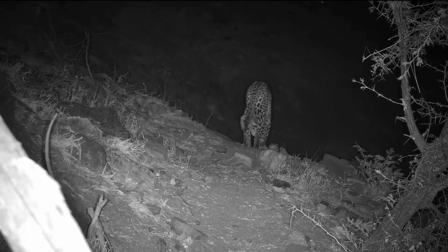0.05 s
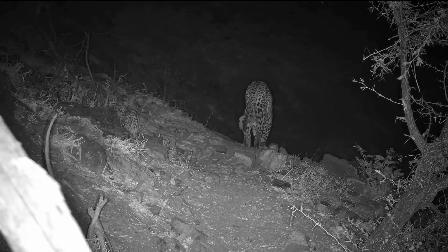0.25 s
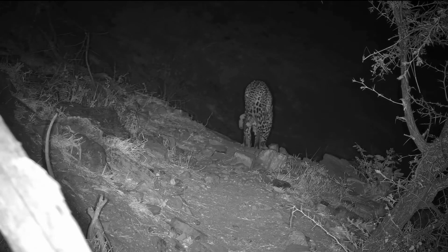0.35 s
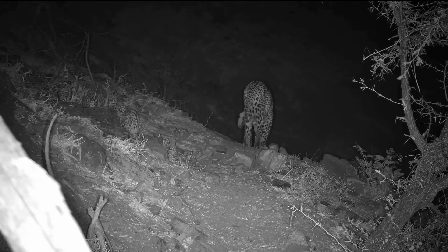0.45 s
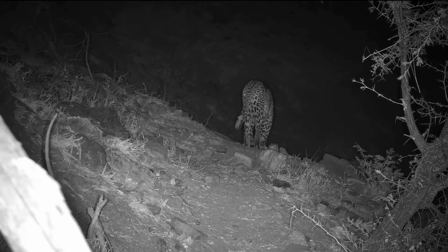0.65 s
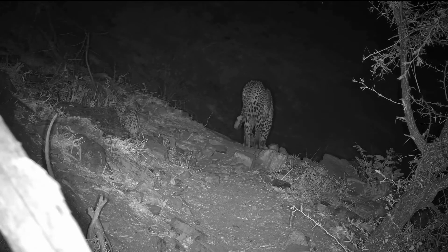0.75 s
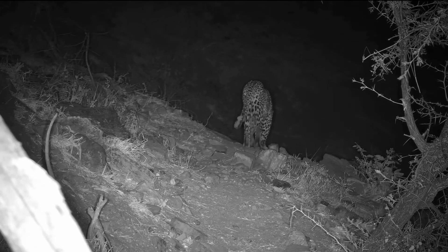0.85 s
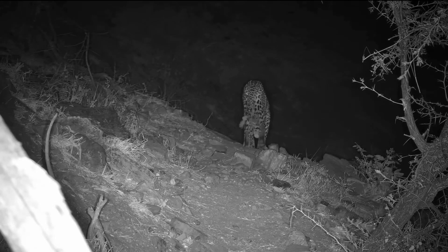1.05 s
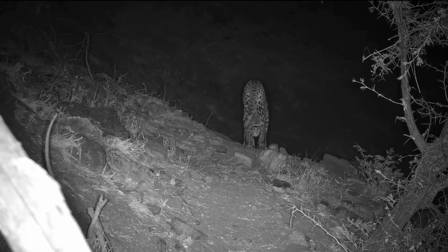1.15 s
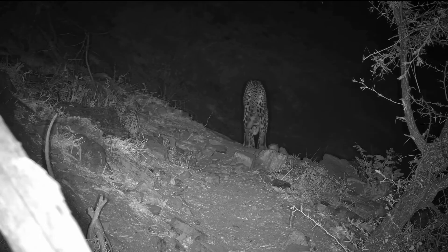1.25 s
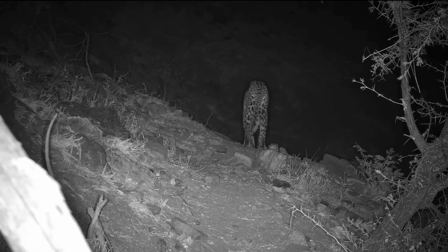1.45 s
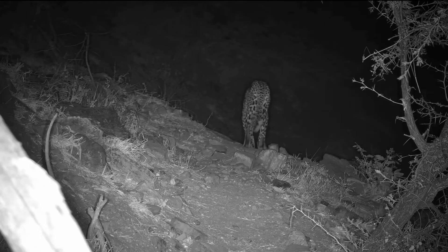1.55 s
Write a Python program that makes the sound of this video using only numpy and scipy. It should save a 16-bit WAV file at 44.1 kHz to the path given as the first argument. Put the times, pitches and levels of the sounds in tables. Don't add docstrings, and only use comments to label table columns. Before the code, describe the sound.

Two hoarse, sawing big cat calls, each a low rattling in-breath then a short throaty cough, outdoors at night. Steady boxy hum and insect buzz lie beneath; a faint distant bird trill and frog pips come late.

```python
import sys
import numpy as np
from scipy import signal
from scipy.fft import rfft, irfft
from scipy.io import wavfile
from scipy.ndimage import uniform_filter1d

SR = 44100
rng = np.random.default_rng(int(sys.argv[2]) if len(sys.argv) > 2 else 0)


def rack_gain(trim_db):
    fader = np.asarray(trim_db, float)
    return 10 ** (fader / 20)


def to_wav(s):
    ch = np.atleast_2d(s).T
    pcm = np.round(np.clip(ch, -1, 1) * 32767)
    wavfile.write(sys.argv[1], SR, pcm.astype(np.int16))


N = 70560

# [f/Hz, density/dB per Hz]
NIGHT_SPECTRUM = [(20, -31), (120, -22.5), (330, -13.5), (500, -11), (900, -20.5), (1500, -30),
                  (2500, -30.5), (11000, -33.5)]
# [t/s, level/dB, mouth opening/dB, chest rumble/dB]
BREATH_EFFORT = [(0, -57.5, 9.5, 9), (0.089, -55.5, 8, 8.5), (.22, -43.5, 4.5, 3), (0.304, -52, 5, 3),
                 (.34, -33, -2.5, -6.5), (.385, -25, -3.5, -3.5), (.44, -32.5, -2, -5.5),
                 (.53, -39, -1.5, -2), (.62, -50, 3, -0.5), (0.841, -50, 1, -2), (.95, -46, 7.5, 10),
                 (1.03, -54, 8, 10.5), (1.114, -38.5, -3, -10), (1.141, -31.5, 1.5, -2.5),
                 (1.18, -32, 2.5, -7), (1.23, -39.5, -1, 1.5), (1.3, -41, -1, -2.5), (1.42, -60, 9, 5)]
# [f/Hz, width/Hz, level/dB]
THROAT_RESONANCES = [(428, 33, -15.5), (531.4, 75, -8.5), (565, 30, -6), (652, 29, -5.5), (718, 61, -5),
                     (816.6, 43, -9)]
# [f/Hz, width/Hz, level/dB]
OPEN_MOUTH_RESONANCES = [(954, 47, -18.5), (1121, 150, -20), (1394, 220, -24), (1606, 71, -21),
                         (1893, 320, -27)]
# [f/Hz, width/Hz, level/dB]
WINDPIPE_RESONANCES = [(40.3, 46, -41), (80, 66, -14.5), (160, 66, -8.5), (284.5, 64, -12.5)]
# [t/s, length/s, peak level/dB]
WHEEZE_BURST = (0.408, 0.085, -59.5)
# [f/Hz, width/Hz, level/dB]
WHEEZE_RESONANCES = [(3270, 500, 0), (5300, 350, -3)]
# [t/s, length/s, peak level/dB, f/Hz]
AIRWAY_WHISTLES = [(0.069, .06, -47, 860), (.18, 0.084, -50.5, 900), (.39, 0.056, -38, 436),
                   (.49, .07, -39, 436), (1.225, 0.052, -50, 980), (.93, 0.071, -42, 925),
                   (1.115, 0.061, -27, 840), (.435, 0.024, -55.5, 3020), (0.58, 0.042, -59, 1300),
                   (1.38, 0.085, -55, 1620)]
# [t/s, length/s, peak level/dB, f/Hz]
CHEST_FLAPS = [(.088, 0.032, -40, 160), (.132, 0.044, -38, 152), (.172, 0.032, -44.5, 160),
               (.208, 0.06, -36, 137), (.248, 0.043, -41, 147), (.315, 0.016, -39, 150.1),
               (.342, 0.027, -26.5, 171.2), (.372, 0.075, -22, 171.7), (.442, 0.038, -28.5, 160),
               (.478, 0.036, -38, 172.3), (.525, 0.026, -39, 147.7), (.845, 0.031, -40.5, 150.6),
               (.888, 0.031, -40, 160), (.934, 0.043, -37, 146), (.972, 0.059, -38.5, 143),
               (1.035, .035, -47, 141.8), (1.075, 0.0338, -42.5, 180.7), (1.108, 0.029, -27.5, 171.3),
               (1.126, 0.056, -24, 175), (1.158, 0.052, -22.5, 160), (1.205, 0.026, -33.5, 153.8),
               (1.238, 0.063, -36.5, 166.8), (1.29, 0.064, -48, 153)]
# [t/s, length/s, peak level/dB, f/Hz]
MOUTH_FLAPS = [(.092, 0.034, -31, 606), (.12, 0.026, -31.5, 603.7), (.158, 0.024, -29, 609.9),
               (.198, 0.034, -28, 590.4), (.23, .03, -25.5, 565), (.258, 0.035, -33.5, 557),
               (.318, 0.026, -28.5, 597.3), (.34, 0.027, -19, 610.5), (.377, .014, -11.5, 629),
               (.398, 0.017, -11.5, 606), (.411, .03, -10.5, 605), (.438, 0.023, -24.5, 585.3),
               (.485, 0.03, -31.5, 610.1), (.503, 0.027, -29.5, 609.9), (.53, 0.059, -32.5, 611),
               (.877, 0.034, -36.5, 600.8), (.918, 0.018, -27, 595.4), (.94, 0.023, -26.5, 571.7),
               (.956, .028, -30.5, 569), (1.025, 0.055, -36, 565), (1.07, 0.027, -35, 619.2),
               (1.115, 0.023, -24.5, 624), (1.135, 0.017, -14.5, 616.5), (1.15, 0.035, -13.5, 610),
               (1.182, .026, -23.5, 587.4), (1.22, 0.039, -33.5, 611), (1.265, 0.044, -29.5, 609),
               (1.36, 0.054, -35, 605.3), (1.472, 0.038, -40, 610.3)]
# [t/s, peak level/dB]
BIRD_NOTES = [(.805, -66), (.85, -60.5), (.895, -58.5), (.94, -57), (.988, -57), (1.052, -52.5),
              (1.118, -55), (1.185, -54), (1.255, -53), (1.327, -53), (1.402, -54), (1.45, -60),
              (1.53, -62.5)]
# [t/s, peak level/dB]
FROG_PIPS = [
    (1.001, -64),
    (1.328, -60),
    (1.479, -56),
]

NIGHT_DB = -49.5
BOX_HZ, BOX_WIDTH_HZ, BOX_DB = 613.7, 32, -48.5
BOX_SKIRT_WIDTH_HZ, BOX_SKIRT_DB = 213, -1.5
CHORUS_HZ, CHORUS_WIDTH_HZ, CHORUS_DB = 4800, 260, -69.5
STROKE_RATE_HZ, STROKE_FIRST_S, STROKE_WIDTH_S = 100.316, .0037, 0.00038
TICK_HZ, TICK_EDGE_HZ, TICK_DB = 10176, 10878, -47
TAIL_HZ, TAIL_LAG_S, TAIL_DB = 8972, 0.00025, -54.5
GRASS_DB = -14.5
RATTLE_HZ, RATTLE_DB = 70.11, 1.5
FLAP_WOBBLE_RAD = .3
SLOPE_ECHO_DB, SLOPE_T60_S = -18, .6
NOTE_S, NOTE_HZ, NOTE_FALL = .033, 3710, .16
PIP_S, PIP_HZ, PIP_FALL = .013, 2640, .03
LEAVES_DB = -7
LIMIT, TOP_HZ = .6, 10990


def level(x, db):
    return x * rack_gain(db) / np.sqrt(np.mean(x ** 2))


def ring(x, hz, width):
    return signal.lfilter(*signal.iirpeak(hz, hz / width, SR), x)


def walk(rate):
    hold = int(SR / rate)
    steps = rng.standard_normal(N)[np.arange(N) // hold]
    return 1.31 * uniform_filter1d(uniform_filter1d(steps, hold), hold)


def swell(start, length, db, edge, lean):
    passed = np.clip((np.arange(N) / SR - start) / length, 0, 1)
    arch = np.maximum(np.sin(np.pi * passed ** lean), 0)
    return rack_gain(db) * arch ** edge, passed


def tones(rows, sag):
    out = np.zeros(N)
    turns = rng.random(len(rows))
    for (start, length, db, hz), turn in zip(rows, turns):
        size, passed = swell(start, length, db, .8, 1)
        cycles = hz * length * (passed - sag * passed ** 3 / 3)
        out += size * np.sin(2 * np.pi * (turn + cycles))
    return out


def smear(x, t60, rise):
    t = np.arange(N // 2) / SR
    tail = rng.standard_normal(len(t)) * rack_gain(-60 * t / t60) * np.clip(t / rise, 0, 1)
    return signal.fftconvolve(x, tail / np.sqrt(np.sum(tail ** 2)))[:N]


def night_air():
    f = np.maximum(np.arange(N // 2 + 1) * SR / N, 1)
    hz, db = np.array(NIGHT_SPECTRUM).T
    gain = rack_gain(np.interp(np.log(f), np.log(hz), db))
    return level(irfft(rfft(rng.standard_normal(N)) * gain, N), NIGHT_DB)


def microphone_box():
    push = rng.standard_normal(N)
    skirt = ring(ring(push, BOX_HZ, BOX_SKIRT_WIDTH_HZ), BOX_HZ, BOX_SKIRT_WIDTH_HZ)
    hum = ring(skirt, BOX_HZ, BOX_WIDTH_HZ)
    return level(hum, BOX_DB) + level(skirt, BOX_DB + BOX_SKIRT_DB)


def insect_chorus():
    chorus = ring(rng.standard_normal(N), CHORUS_HZ, CHORUS_WIDTH_HZ)
    return level(chorus * rack_gain(1.5 * walk(25)), CHORUS_DB)


def katydid():
    t = np.arange(N) / SR

    def gate(lag):
        cycle = (t - STROKE_FIRST_S - lag) * STROKE_RATE_HZ
        offset = ((cycle + .5) % 1 - .5) / STROKE_RATE_HZ
        return np.exp(-.5 * (offset / STROKE_WIDTH_S) ** 2)

    def tone(hz, wander):
        return np.sin(2 * np.pi * hz * t + wander)

    drift = 1.2 * walk(6) + .7 * walk(150)
    edge = 0.59 * tone(TICK_EDGE_HZ, drift + 1.9 * walk(98))
    tick = rack_gain(TICK_DB) * gate(0) * (tone(TICK_HZ, drift) + edge)
    tail = rack_gain(TAIL_DB) * gate(TAIL_LAG_S) * tone(TAIL_HZ, drift + .8 * walk(100))
    strokes = (tick + tail) * rack_gain(1.2 * walk(120))
    return strokes + rack_gain(GRASS_DB) * smear(strokes, .06, .003)


def breath():
    t, db, opening, rumble = np.array(BREATH_EFFORT).T
    air = rng.standard_normal(N) * rack_gain(RATTLE_DB * walk(RATTLE_HZ))

    def curve(points):
        return rack_gain(np.interp(np.arange(N) / SR, t, points))

    def resonate(rows):
        out = np.zeros(N)
        for k, (hz, width, gain) in enumerate(rows):
            wide = 1.58 * width
            out += (-1) ** k * level(ring(ring(air, hz, wide), hz, wide), gain)
        return out

    mouth = curve(opening) * resonate(OPEN_MOUTH_RESONANCES)
    chest = curve(rumble) * resonate(WINDPIPE_RESONANCES)
    wheeze = swell(*WHEEZE_BURST, 0.5, 0.54)[0] * resonate(WHEEZE_RESONANCES)
    return curve(db) * (resonate(THROAT_RESONANCES) + mouth + chest) + wheeze


def airway_whistles():
    return tones(AIRWAY_WHISTLES, 0.0098)


def cavity(rows, edge, lean):
    start, length, _, hz = np.array(rows).T
    power = sum(swell(s, d, db, edge, lean)[0] ** 2 for s, d, db, _ in rows)
    size = uniform_filter1d(np.sqrt(power), size=110)
    pitch = np.interp(np.arange(N) / SR, start + length / 2, hz)
    phase = 2 * np.pi * np.cumsum(pitch) / SR
    flutter = rack_gain(0.62 * walk(hz.mean() / 4.5))
    return size * flutter * np.sin(phase + FLAP_WOBBLE_RAD * walk(hz.mean() / 6))


def cat():
    chest = cavity(CHEST_FLAPS, edge=1.0, lean=.75)
    mouth = cavity(MOUTH_FLAPS, edge=.6, lean=.75)
    voice = breath() + airway_whistles() + chest + mouth
    return voice + rack_gain(SLOPE_ECHO_DB) * smear(voice, SLOPE_T60_S, .12)


def bird():
    return tones([(t, NOTE_S, db, NOTE_HZ) for t, db in BIRD_NOTES], NOTE_FALL)


def frog():
    return tones([(t, PIP_S, db, PIP_HZ) for t, db in FROG_PIPS], PIP_FALL)


def through_leaves(song):
    return song * rack_gain(walk(150)) + rack_gain(LEAVES_DB) * smear(song, .3, .02)


def scene():
    night = night_air() + microphone_box() + insect_chorus()
    return (night + katydid() + cat() + through_leaves(bird() + frog()))[None]


def top_cut(x):
    return signal.sosfilt(signal.butter(12, 12230, fs=SR, output="sos"), x)


def record(dry):
    rounded = LIMIT * np.tanh(dry / LIMIT)
    lowpass = signal.ellip(10, .2, 60, TOP_HZ, fs=SR, output="sos")
    return top_cut(signal.sosfilt(lowpass, rounded))


dry = scene()
out = record(dry)
to_wav(out)
```